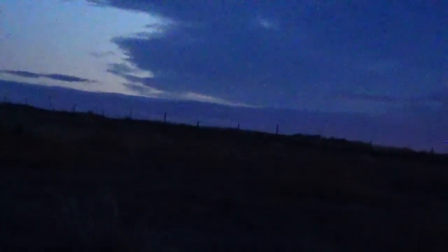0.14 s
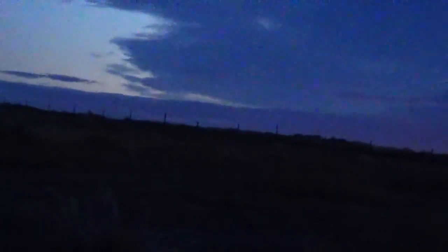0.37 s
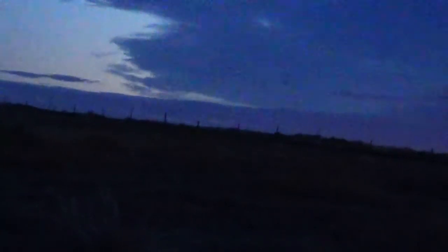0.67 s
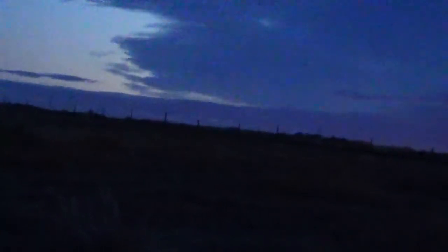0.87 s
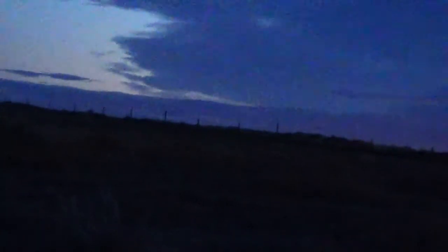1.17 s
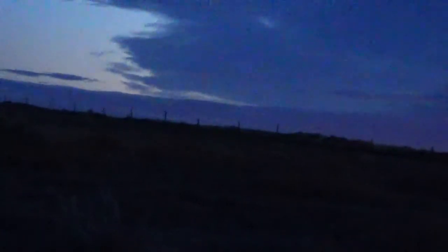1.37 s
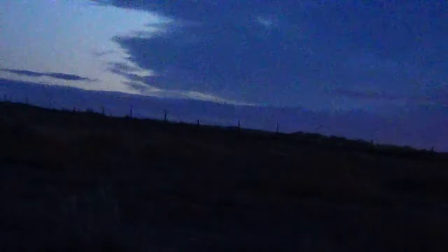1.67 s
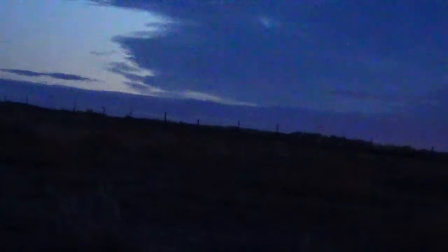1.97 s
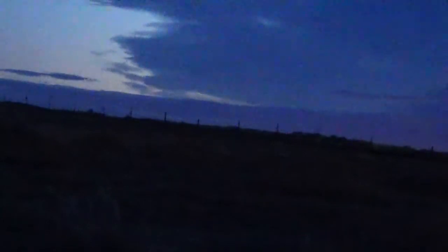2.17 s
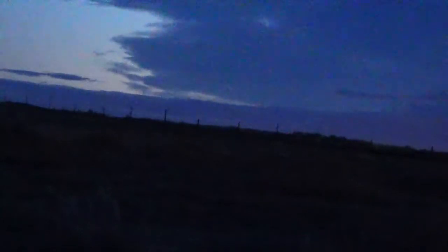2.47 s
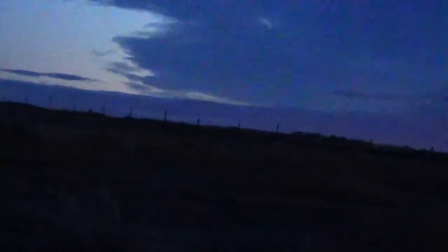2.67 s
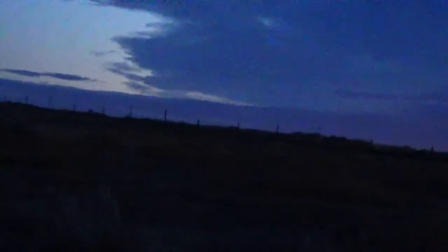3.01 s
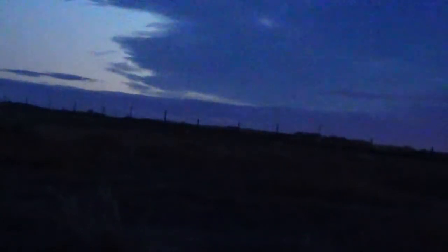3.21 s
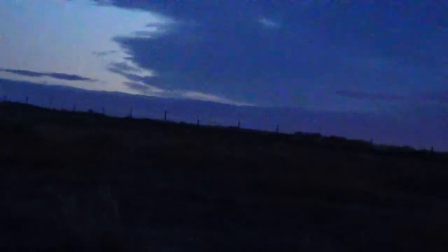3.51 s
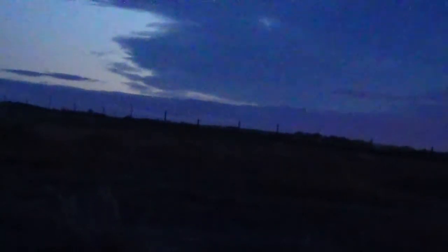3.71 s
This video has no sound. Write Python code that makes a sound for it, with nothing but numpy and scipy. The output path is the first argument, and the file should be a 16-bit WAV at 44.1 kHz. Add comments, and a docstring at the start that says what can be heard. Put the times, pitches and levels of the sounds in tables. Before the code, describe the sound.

Coyotes yip and howl in thin wavering calls across an open field, dry crackling close by

```python
"""Coyotes yip and howl across an open field, off to the left; more of the pack yaps faintly far behind them.
Each call is a thin fluttering tone, carried mostly by its second harmonic; hoarse yaps are narrow-band noise.
Close by, coloured noise bursts make dry snaps and duller clicks, and clumps of tiny ticks over hiss rustle.
One hard knock rattles with short ringing modes; soft low bumps and a steady hush are filtered noise."""
import sys
import numpy as np
from scipy import signal
from scipy.fft import rfft, irfft
from scipy.io import wavfile
from scipy.ndimage import uniform_filter1d

SR = 44100
rng = np.random.default_rng(int(sys.argv[2]) if len(sys.argv) > 2 else 0)


def waveform_to_disk(signal):
    """Save audio, clipped to [-1, 1], as 16-bit WAV at the path in sys.argv[1]."""
    frames = np.transpose(np.atleast_2d(signal))
    scaled = np.clip(frames, -1, 1) * 32767
    samples = np.round(scaled).astype(np.int16)
    wavfile.write(sys.argv[1], SR, samples)


N = 169785
TIME_S, FREQ_HZ = np.arange(N) / SR, np.fft.rfftfreq(N, 1 / SR)
NEAR_LIKENESS = .85  # left-right correlation of close sounds


def amp(db):
    """Decibels to gain."""
    return 10 ** (np.asarray(db) / 20)


def unit(x):
    """Scales to rms 1."""
    return x / np.sqrt(np.mean(x ** 2) + 1e-20)


def read(points, hz, axis=1):
    """Reads a table column along log frequency."""
    table = np.transpose(points)
    return np.interp(np.log(hz + 1), np.log(table[0] + 1), table[axis])


def add(mix, start_s, sound):
    """Mixes a sound in at its start time, cut at the end of the mix."""
    part = mix[..., max(round(start_s * SR), 0):][..., :sound.shape[-1]]
    part += sound[..., :part.shape[-1]]


def drift(size, width_hz):
    """Low-passed noise, scaled to rms 1 over N samples, then cut to size."""
    lowpass = np.exp(-(FREQ_HZ / width_hz) ** 2)
    return unit(irfft(rfft(rng.standard_normal(N)) * lowpass, N))[:size]


def colour(x, points):
    """Causal minimum-phase filter that keeps the power of white noise."""
    gain = amp(read(points, abs(np.fft.fftfreq(4096, 1 / SR))))
    spectrum = np.exp(np.conj(signal.hilbert(np.log(gain))))
    taps = np.fft.ifft(spectrum).real[:len(gain) // 2]
    return signal.oaconvolve(x, taps[None] / np.linalg.norm(taps), axes=1)[:, :x.shape[1]]


def pan(db):
    """Left and right gains of mean 1 for a left-minus-right level."""
    gains = amp([[db / 2], [-db / 2]])
    return gains / gains.mean()


def noise_pair(size, likeness):
    """Two channels of white noise with a given correlation."""
    left, other = rng.standard_normal((2, size))
    c = np.clip(likeness, -1, 1)
    return np.array([left, c * left + np.sqrt(1 - c * c) * other])


def air():
    """Steady hush of the field and microphone: band-shaped noise with a slight level flutter."""
    # hush spectrum: (frequency [Hz], gain [dB])
    hush_colour = [(15, -50), (25, -23), (327, -9), (468, -2), (1430, -3), (1670, -2), (1950, -5),
                   (2330, -4.5), (4750, -13), (8530, -15), (11000, -19), (14300, -75), (22000, -120)]
    level_db, swell_db, swell_hz, top_hz, pan_db = -56, .4, 21, 11100, 1.5
    gain = amp(read(hush_colour, FREQ_HZ)) / (1 + (FREQ_HZ / top_hz) ** 70)
    hush = irfft(rfft(noise_pair(N, likeness=.7)) * gain, N)
    return amp(level_db + swell_db * drift(N, swell_hz)) * pan(pan_db) * unit(hush)


def bumps():
    """Soft bumps of air or handling: low noise in half-sine swells with an uneven level."""
    # swells: (time [s], length [s], peak level [dB])
    swells = [(0, 0.16, -60.5), (0.418, 0.14, -62), (1.257, 0.29, -54.5), (1.371, 0.031, -51),
              (1.676, 0.042, -51.5), (2.566, 0.27, -66)]
    # bump spectrum: (frequency [Hz], gain [dB])
    bump_colour = [(20, -21.5), (140, -7), (400, -17), (1000, -64)]
    rest_db, lump_db, lump_hz = -77, 2.1, 30
    level = np.full(N, amp(rest_db))
    for start_s, length_s, db in swells:
        add(level, start_s, amp(db) * np.sin(np.pi * np.arange(0, length_s, 1 / SR) / length_s))
    lumps = amp(lump_db * drift(N, lump_hz))
    return level * lumps * colour(noise_pair(N, likeness=0.77), bump_colour)


def rustle_grains():
    """Random ticks: damped sines at 24 pitches, each tick of random strength."""
    grains_per_s, spread_db, decay_cycles = 4000, 4, 4
    grains = np.zeros((2, N))
    pitches_hz = np.linspace(900, 10500, 24)
    t = TIME_S[:SR // 50]
    for hz in pitches_hz:
        tick = np.sin(2 * np.pi * hz * t) * np.exp(-t * hz / decay_cycles)
        hits = rng.random(N) < grains_per_s / len(pitches_hz) / SR
        train = hits * amp(spread_db * np.minimum(rng.exponential(1, N), 3))
        source = train * noise_pair(N, NEAR_LIKENESS)
        grains += signal.oaconvolve(source, tick[None] / np.linalg.norm(tick), axes=1)[:, :N]
    return grains


def rustle():
    """Dry rustling: clumped ticks over a soft hiss, following one level curve."""
    # level curve, before lift_db: (time [s], level [dB])
    rustle_curve = [(0,-64.5),(.29,-57.5),(.35,-50),(.5,-55),(.65,-63.5),(1.75,-64.5),(1.81,-45),(1.99,-53),(2.13,-49),(2.35,-51.5),(2.65,-64),(2.85,-71),(3.27,-68.5),(3.42,-56),(3.85,-63.5)]
    # rustle spectrum: (frequency [Hz], gain [dB])
    rustle_colour = [(150, -4.5), (500, 0), (1200, 5.5), (2600, 6), (3600, 0.5), (4500, -0.5), (6500, 2),
                     (9000, -4), (10800, -7.5), (11800, -78)]
    lift_db, pan_db, clump_db, clump_hz = 4, 4, 1.7, 70
    grain_share = .6  # of the power
    grains = unit(colour(rustle_grains(), rustle_colour))
    hiss = colour(noise_pair(N, likeness=0.37), rustle_colour)
    drive = np.sqrt(grain_share) * grains + np.sqrt(1 - grain_share) * hiss
    curve_db = np.interp(TIME_S, *np.transpose(rustle_curve))
    level = amp(lift_db + curve_db + clump_db * drift(N, clump_hz))
    return pan(pan_db) * level * drive


def crack(db, pan_db, tone, fall_s, tail_db, tail_s):
    """Noise burst with a fast fall and a fainter tail, coloured by what breaks or is struck."""
    t = np.arange(3000) / SR
    envelope = np.exp(-t / fall_s) + amp(tail_db) * np.exp(-t / tail_s)
    burst = colour(noise_pair(len(t), NEAR_LIKENESS) * envelope, tone)
    burst = burst / np.linalg.norm(burst, axis=1, keepdims=True)
    return amp(db) * pan(pan_db) * burst * np.sqrt(fall_s * SR / 2)  # energy of the fast fall


def knock():
    """A small hard object is struck and rattles: cracks plus damped ringing modes."""
    # strikes: (time [s], crack level [dB], ring level [dB])
    strikes = [(3.4386, -9.5, -34.5), (3.453, -35, -29), (3.474, -30.5, -31), (3.484, -44, -29)]
    # crack spectrum: (frequency [Hz], gain [dB])
    knock_colour = [(100, -36), (600, -10), (1200, 8), (3300, 0.5), (4100, -6), (5600, -6), (6800, -25.5),
                    (9300, -23), (12000, -67)]
    # ringing modes: (frequency [Hz], level [dB], 60 dB decay time [s])
    modes = [(1079, 4.5, 0.038), (2040, -17, 0.071), (2430, -17, 0.13), (3200, -18, 0.058)]
    pan_db, rise_s = 6.0, 0.00045
    out, t = np.zeros((2, N)), np.arange(SR // 5) / SR
    ring = sum(amp(db - 60 * t / t60_s) * np.sin(2 * np.pi * hz * t) for hz, db, t60_s in modes)
    ring = ring * (1 - np.exp(-t / rise_s))
    for start_s, crack_db, ring_db in strikes:
        hit = crack(crack_db, pan_db, knock_colour, fall_s=0.00082, tail_db=-18.5, tail_s=0.011)
        add(out, start_s, hit)
        add(out, start_s, amp(ring_db) * pan(pan_db) * ring)
    return out


def crackles():
    """Close crackling: dry snaps in the centre and duller, slower clicks to the left."""
    # dry snaps: (time [s], level [dB])
    snaps = [(.319, -14), (0.333, -20), (0.3513, -24), (0.368, -25.5), (0.4275, -11.5), (0.4512, -15),
             (0.46, -15.5), (0.4685, -16.5), (0.4756, -10.5), (0.478, -19.5), (0.4847, -11.5),
             (1.8455, -30.5), (1.892, -27), (2.117, -25), (2.25, -43), (2.287, -26)]
    # snap spectrum: (frequency [Hz], gain [dB])
    snap_colour = [(100, -19), (1200, -6), (1800, -2.5), (2500, 3), (3400, -5.5), (4800, -5.5), (5900, 1),
                   (8700, -2), (10200, -12), (14000, -43)]
    # duller clicks: (time [s], level [dB])
    clicks = [(1.0919, -22), (1.392, -32.5), (1.5793, -29.5), (1.794, -21.5), (1.798, -17.5),
              (1.8381, -23.5), (1.927, -11), (2.032, -28), (2.0865, -25), (2.1826, -25.5), (2.829, -38)]
    # click spectrum: (frequency [Hz], gain [dB])
    click_colour = [(100, -16), (650, -17.5), (1100, 4.5), (3300, 5), (4150, 7), (5100, 0.5), (8800, -2),
                    (10200, -10.5), (12000, -36)]
    out = np.zeros((2, N))
    for start_s, db in snaps:
        add(out, start_s, crack(db, 0, snap_colour, fall_s=0.00047, tail_db=-16.5, tail_s=0.0062))
    for start_s, db in clicks:
        add(out, start_s, crack(db, 6, click_colour, fall_s=0.00086, tail_db=-14.5, tail_s=0.013))
    return out


def far_pack():
    """Rest of the pack: faint two-harmonic calls at random times, pitch and level arching together."""
    calls_per_s, level_db, call_s = 8.3, -64, 0.28
    centre_hz, log_spread, pitch_arch = 1462, 0.27, 0.13
    flutter, flutter_hz = 0.01284, 43.0
    out = np.zeros(N)
    draws = rng.uniform(-0.92, 1, (int(calls_per_s * N / SR), 3))
    for k, (when, high, long) in enumerate(draws):
        u = np.linspace(0, 1, int(SR * call_s * (1 + .5 * long)))
        arch = np.sin(np.pi * u)
        bend = 1 + pitch_arch * (arch - 1) + flutter * drift(len(u), flutter_hz)
        hz = centre_hz * np.exp(log_spread * high) * bend
        phase = 2 * np.pi * np.cumsum(hz) / SR
        call = arch * (np.sin(phase) + amp(-3) * np.sin(2 * phase))
        add(out, (k + when - 1) / calls_per_s, call)
    return amp(level_db) * unit(out)


def rasp(start_s, length_s, db, hz, width_hz):
    """Hoarse yap: chaotic voice as noise in one or two falling narrow bands under a half-sine."""
    sag = 0.0746  # fractional pitch fall
    upper_ratio, upper_db, upper_top_hz = 1.45, -3.5, 2700
    u = np.arange(0, length_s, 1 / SR) / length_s
    phase = 2 * np.pi * np.cumsum(hz * (1 - sag * (u - .5))) / SR

    def band(p):
        return drift(len(u), width_hz) * np.cos(p) + drift(len(u), width_hz) * np.sin(p)

    lower = band(phase)
    upper = band(upper_ratio * phase) * (upper_ratio * hz < upper_top_hz)  # silent for high yaps
    return start_s, amp(db) * unit(lower + amp(upper_db) * upper) * np.sin(np.pi * u)


def howl(curve, first_db):
    """One call: three harmonics with flutter; the third sounds only near a throat resonance."""
    third_db, throat_hz, throat_width_hz = -4, 3660, 150
    edge_s, jitter, shimmer_db, flutter_hz = .006, .004, 1, 70
    s, pitch_hz, db = np.transpose(curve)
    t = np.arange(s[0], s[-1], 1 / SR)
    glide_hz = uniform_filter1d(np.interp(t, s, pitch_hz), size=500, mode="nearest")
    hz = glide_hz * (1 + jitter * drift(len(t), flutter_hz))
    phase = 2 * np.pi * np.cumsum(hz) / SR
    third = amp(third_db) / (1 + ((3 * hz - throat_hz) / throat_width_hz) ** 4)
    voice = amp(first_db) * np.sin(phase) + np.sin(2 * phase) + third * np.sin(3 * phase)
    edges = np.clip(np.minimum(t - s[0], s[-1] - t) / edge_s, 0, 1)
    level = amp(np.interp(t, s, db) + shimmer_db * drift(len(t), flutter_hz))
    return s[0], voice * edges * level


def near_voices():
    """Howls, yips and hoarse yaps of the nearer coyotes, in mono."""
    # call curves: (time [s], pitch [Hz], second harmonic before shimmer [dB])
    far_yip = [(.205,1090,-63),(.235,1370,-49.5),(.26,1690,-55)]
    wavering_howl = [(.3,1430,-44.5),(.385,1792,-39.5),(.43,1730,-40.5),(.47,1750,-45),(.517,1530,-40),(.555,1730,-39.5),(.575,1575,-37.5),(.62,1610,-45.5),(.648,1710,-36),(.68,1711,-35.5),(.712,1774,-35.5),(.745,1920,-68)]
    faint_howl = [(.96,1195,-50),(.997,1847,-50.5),(1.055,1770,-49.5),(1.11,2000,-65),(1.19,1880,-63),(1.225,1800,-49),(1.28,1930,-65.5),(1.335,1715,-35),(1.355,1710,-67)]
    short_yip = [(1.525, 1072, -57), (1.587, 1620, -40.5), (1.597, 1650, -70)]
    rising_howl = [(1.62,1516,-51),(1.655,1597,-32.5),(1.735,1720,-37),(1.79,1742,-43),(1.83,1830,-62)]
    long_howl = [(2.1,973,-43.5),(2.14,1165,-37.5),(2.225,1430,-44),(2.255,1710,-34),(2.3,1870,-53.5),(2.35,1656,-36.5),(2.48,1740,-33.5),(2.52,1760,-42.5),(2.565,1792,-32),(2.63,1691,-32),(2.655,1554,-34)]
    climbing_howl = [(2.865,1061,-55),(2.898,1149,-35.5),(2.915,1282,-52.5),(2.94,1301,-40.5),(2.975,1220,-45.5),(3.05,1416,-33),(3.087,1530,-33),(3.15,1505,-34),(3.195,1555,-40.5),(3.268,1485,-39.5)]
    quick_yip = [(3.52, 1063, -48.5), (3.558, 1177, -31), (3.586, 1250, -55)]
    voice_break = [(3.581, 1670, -44.5), (3.633, 1557, -52), (3.638, 1600, -66)]
    last_howl = [(3.633,1223,-31),(3.648,1200,-43),(3.695,1414,-32.5),(3.755,1303,-44),(3.85,1330,-36.5)]
    # hoarse yaps: (time [s], length [s], level before the half-sine [dB], pitch [Hz], noise width [Hz])
    rasps = [(.725, 0.022, -44, 1953, 139), (1.105, 0.1, -40.5, 1550, 220),
             (1.354, 0.066, -49.5, 3390, 180), (1.604, 0.026, -41.5, 1990, 99),
             (2.444, 0.078, -45.5, 1360, 69.5), (2.626, 0.041, -46, 1377, 220),
             (3.055, 0.085, -46.5, 1480, 250), (3.17, 0.12, -50.5, 1530, 201),
             (3.326, 0.11, -48.5, 1530, 400)]
    # (curve, fundamental relative to second harmonic [dB])
    chorus = [(far_yip, -5), (wavering_howl, -6), (faint_howl, -10), (short_yip, -13),
              (rising_howl, -20), (long_howl, -10.5), (climbing_howl, -13.5), (quick_yip, -23),
              (voice_break, 0), (last_howl, -19)]
    voices = np.zeros(N)
    for curve, first_db in chorus:
        add(voices, *howl(curve, first_db))
    for row in rasps:
        add(voices, *rasp(*row))
    return voices


def coyotes():
    """All voices placed left by level and phase, with the field's echo as decaying noise."""
    # direction: (frequency [Hz], left minus right [dB], left lead [rad])
    bearing = [(1000, 11.5, -1.24), (3530, 10.5, -0.66)]
    echo_db, echo_t60_s = -47, 0.56  # echo_db applies to the near voices only
    voices, pack = near_voices(), far_pack()
    right = amp(-read(bearing, FREQ_HZ)) * np.exp(-1j * read(bearing, FREQ_HZ, axis=2))
    sides = np.array([np.ones(len(FREQ_HZ)), right]) * 2 / abs(1 + right)  # mono sum stays level
    direct = irfft(rfft(voices + pack) * sides, N)
    t = np.arange(SR) / SR
    tail = noise_pair(SR, likeness=0.17) * amp(-60 * t / echo_t60_s)
    tail = tail / np.linalg.norm(tail[0])
    echo = signal.fftconvolve((amp(echo_db) * voices + pack)[None], tail, axes=1)[:, :N]
    return direct + pan(db=39) * echo


def scene():
    """Everything in the field, left and right."""
    return coyotes() + crackles() + knock() + rustle() + bumps() + air()


def record(dry):
    """The recorder's band limit: a linear-phase low-pass."""
    taps = signal.firwin(255, 12700, window=("kaiser", 8), fs=SR)  # cutoff in Hz
    return signal.oaconvolve(dry, taps[None], "same")


dry = scene()
out = record(dry)
waveform_to_disk(out)
```